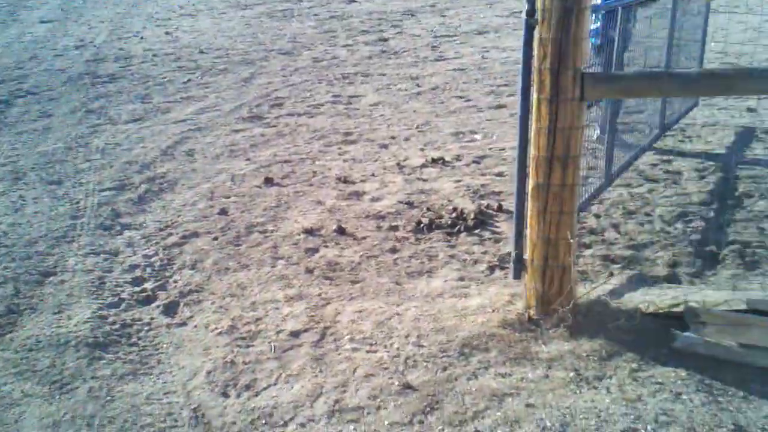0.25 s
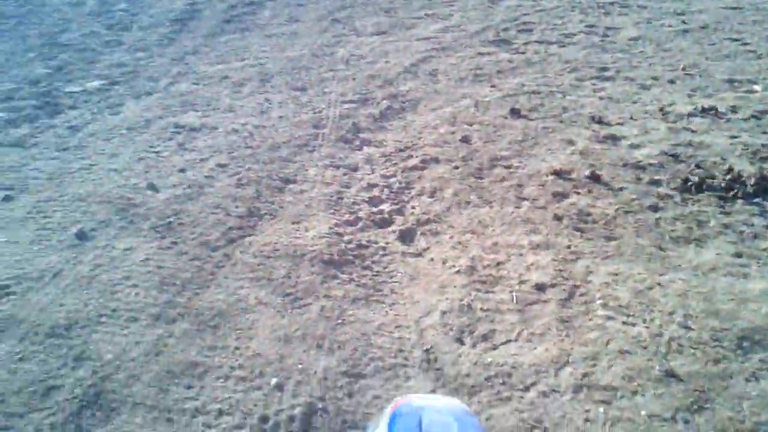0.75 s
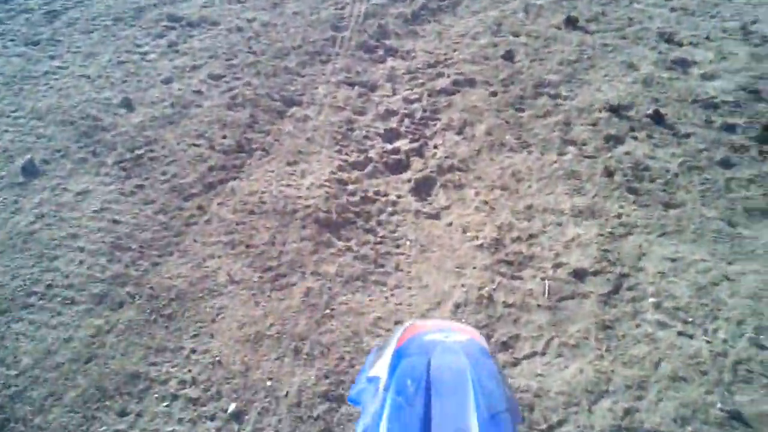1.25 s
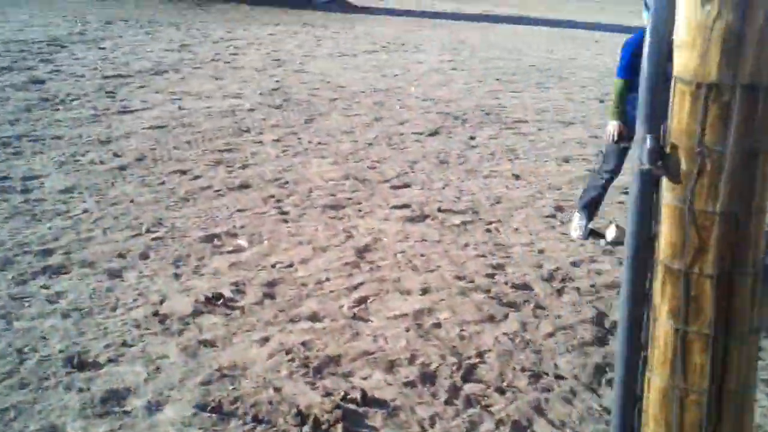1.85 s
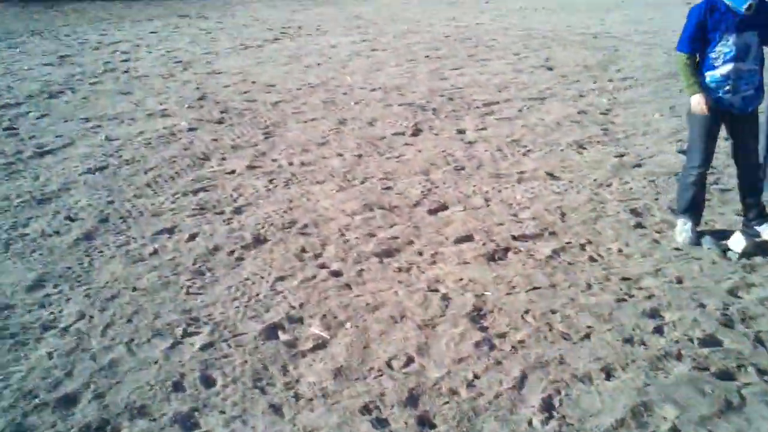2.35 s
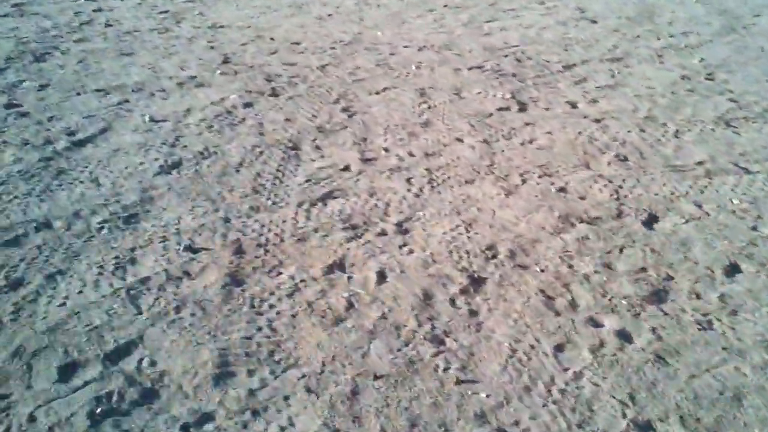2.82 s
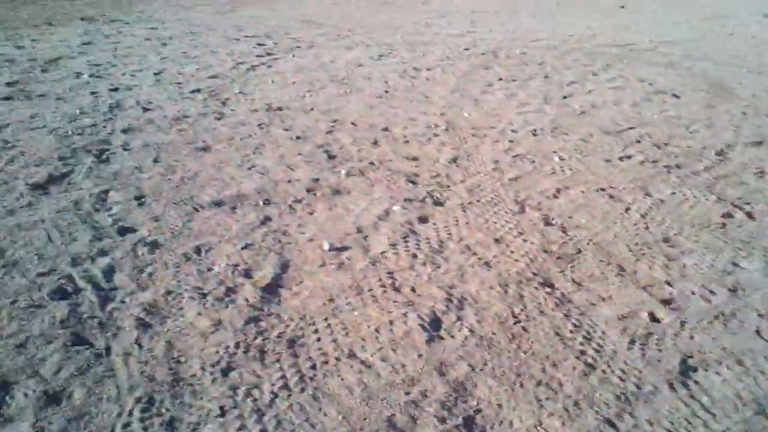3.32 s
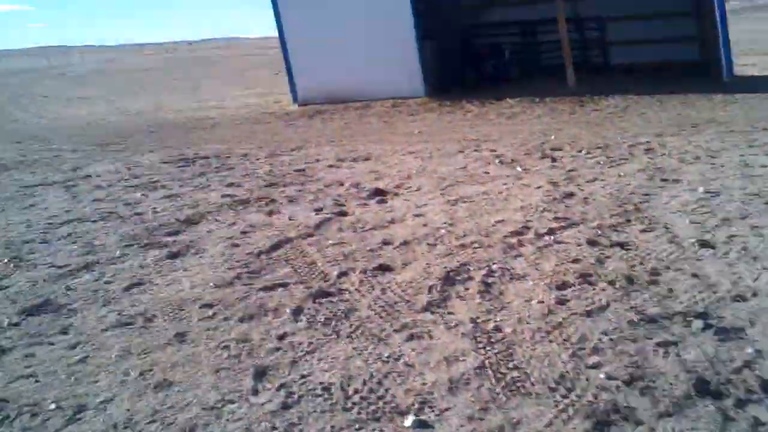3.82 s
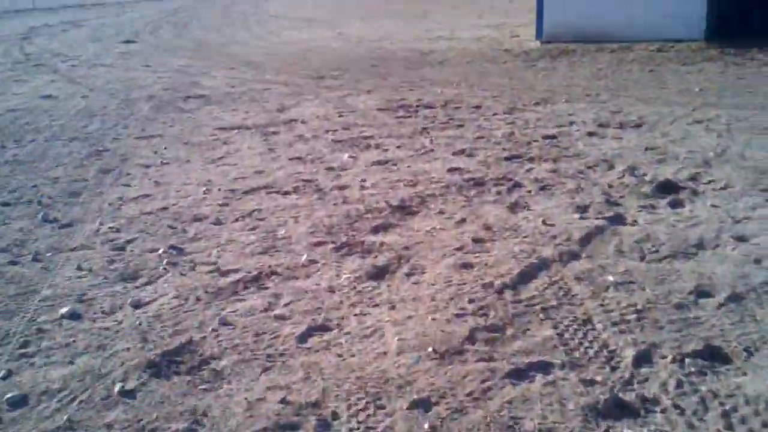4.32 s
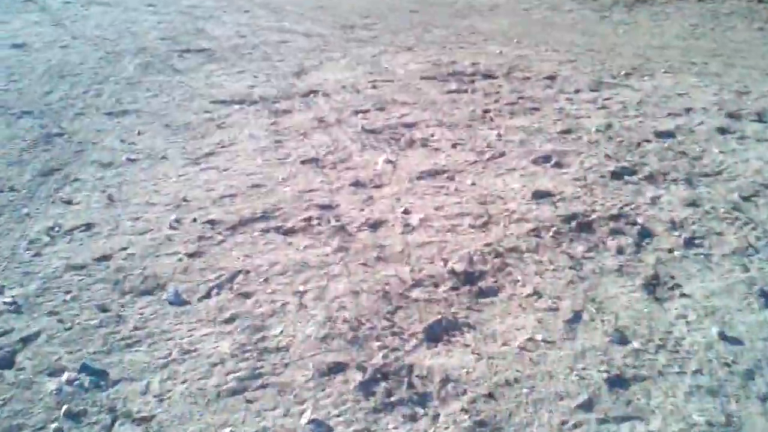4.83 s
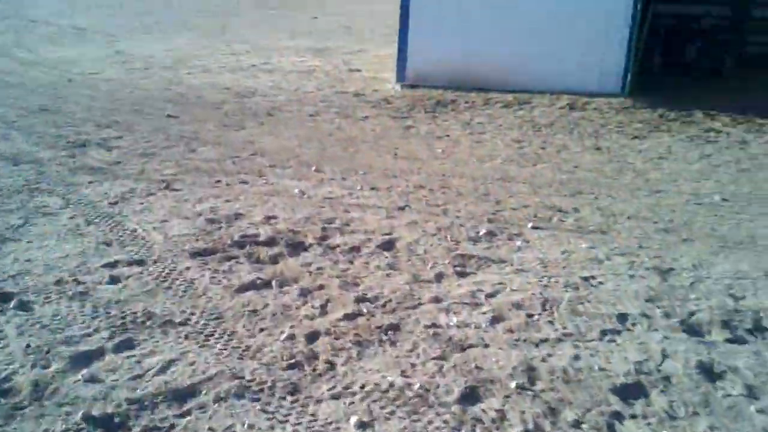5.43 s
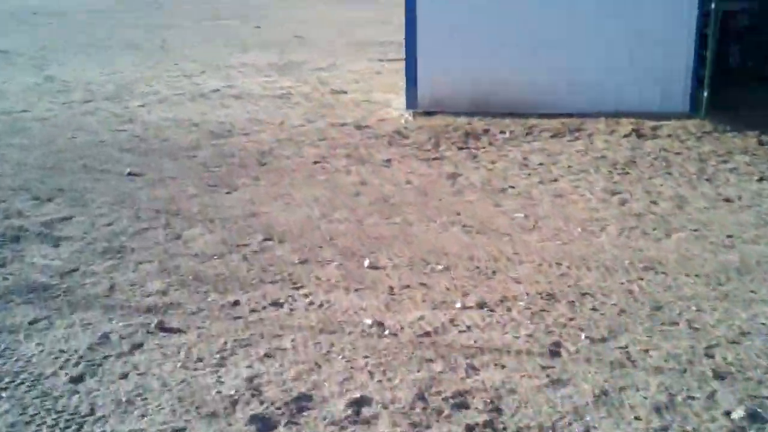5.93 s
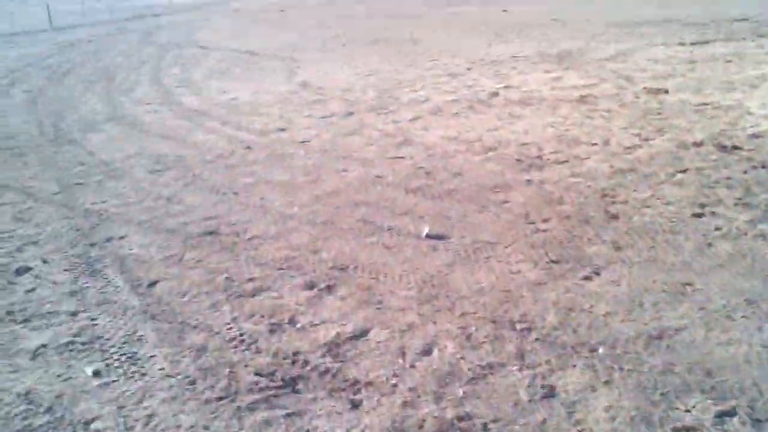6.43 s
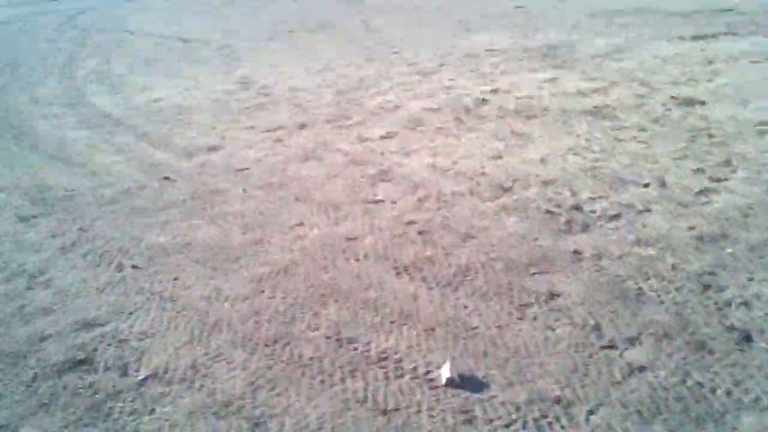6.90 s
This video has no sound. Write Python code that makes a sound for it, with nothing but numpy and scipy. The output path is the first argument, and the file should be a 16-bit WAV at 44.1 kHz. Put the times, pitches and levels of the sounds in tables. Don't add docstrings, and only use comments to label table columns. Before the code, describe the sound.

Close on a rider's helmet, a small two-stroke dirt bike gives three sharp throttle blips, dropping between them, with a brief metallic chatter as the throttle snaps shut. It sags low, picks up and rolls off in an uneven, sputtering burble, with dry piston knocks, fin rattle, exhaust spits and faint gear whine. Wind rumble grows; another engine hums faintly, in an open dirt yard.

```python
import sys
import numpy as np
from scipy import signal
from scipy.fft import rfft, irfft
from scipy.io import wavfile
from scipy.ndimage import uniform_filter1d

SR = 44100
rng = np.random.default_rng(int(sys.argv[2]) if len(sys.argv) > 2 else 0)


def natural_amplitude(level_db):
    exponent = np.asarray(level_db, float) / 20
    return 10 ** exponent


def wrap_up_sound(samples):
    columns = np.atleast_2d(samples).T
    tamed = np.clip(columns, -1, 1)
    steps = np.round(tamed * 32767).astype(np.int16)
    wavfile.write(sys.argv[1], SR, steps)


N = 315756
TIME = np.arange(N) / SR
FREQ = np.arange(N // 2 + 1) * SR / N

# time_s, speed_turns_hz
CRANK_SPEED = [(0, 66), (.125, 103), (.49, 43), (.7, 50), (.89, 118), (1.105, 85), (1.215, 120), (1.33, 90),
               (1.45, 53), (1.62, 61), (1.84, 36), (2.29, 64.5), (2.6, 44.5), (2.8, 47.5), (3.95, 48.5),
               (4.2, 52), (5.4, 57), (7.16, 57.5)]
# open_s, shut_s, open_level_db, shut_level_db
THROTTLE_TWISTS = [(-.05, 0.091, -19, -18), (0.45, 0.513, -46, -26), (0.55, 0.697, -32, -22.5),
                   (0.69, 0.74, -21, -18.5), (0.733, 0.854, -20, -20.5), (1.043, 1.13, -30.5, -17.5),
                   (1.122, 1.195, -14.5, -22), (1.43, 1.648, -28.5, -28), (1.71, 2.08, -36, -27),
                   (2.09, 2.265, -28, -22), (2.277, 2.51, -30.5, -26.5), (2.61, 2.715, -46, -26),
                   (2.72, 3.041, -31, -27.5), (3.115, 3.503, -29, -37), (3.5, 4.03, -36.5, -40),
                   (4.044, 4.2, -29, -28), (4.203, 4.33, -20, -24), (4.341, 4.642, -36, -37.5),
                   (4.656, 5.303, -24.5, -26), (5.294, 5.794, -23.5, -26), (5.802, 6.03, -21, -33),
                   (6.02, 6.124, -52, -28.5), (6.158, 6.373, -43, -33), (6.395, 6.789, -28, -25),
                   (6.78, 7.085, -27, -26), (7.127, 7.2, -22, 0.5)]
# start_s, end_s, level_db
BOG_DOWNS = [
    (0.203, 0.427, -5.5),
    (1.16, 1.463, -6.5),
    (2.486, 2.594, 6.5),
]
# time_s, level_db
ROLLING_LOAD = [(.6, 11), (.85, 11.5), (1.1, 8.5), (1.6, 2), (2.6, 0), (3.4, 6.5), (4.2, 14.5), (4.8, 13),
                (5.9, 8), (7.16, 11.5)]
# time_s, gas_noise_share [0-1]
ROUGHNESS = [(.13, .07), (.3, .4), (.6, .3), (.73, .04), (1.22, .03), (1.36, .35), (1.55, .12), (1.7, .3),
             (1.88, .04), (2.3, .025), (2.5, .1), (2.62, .14), (3, .08), (3.8, .3), (4.7, .14), (5.9, .13),
             (6.2, .35), (7.16, .2)]
# start_s, gap_s, peak_db, next_turn_loss_db (grows as turns squared)
CATCH_RUNS = [(2.399, .048, -5, 2.5), (2.55, .067, -2, 1.2), (2.684, .042, -1, 6.4), (3.058, .14, 6, 0.85),
              (3.198, .082, 1.5, 1.4), (3.444, .079, 5.5, 0.74), (3.602, .186, 7, 8.6), (3.788, .06, 4, 10),
              (3.907, .1, 2.5, 1.1), (4.058, .039, 2, 9.6), (4.215, .038, -5, .5), (4.309, .069, -4, 0.59),
              (4.378, .097, 3, 0.24), (4.475, .05, -0.5, 1.3), (4.577, .097, -1.5, 0.22),
              (4.674, .075, -1.5, .5), (4.748, .038, -3, 6), (4.787, .056, -1.5, 0.65),
              (4.844, .037, -4.5, 6.7), (4.916, .055, -4, .3), (4.971, .035, -1, 3.7),
              (5.004, .056, -1.5, 4.34), (5.062, .054, 4, 0.55), (5.115, .054, 3, 7),
              (5.171, .034, 3.5, 4.4), (5.204, .053, 5, 0.65), (5.311, .034, 3, 12), (5.345, .069, -1, 1),
              (5.414, .053, -2.5, 1.3), (5.466, .052, -6, 7.5), (5.519, .033, -6.5, 8.7),
              (5.551, .069, -5.5, 5.6), (5.62, .034, -3.5, 13), (5.654, .052, -2, 5),
              (5.706, .033, -0.5, 12), (5.74, .087, 0.5, 12), (5.826, .104, 8, 2.1), (5.93, .068, 10, 1.5),
              (5.997, .104, 6.5, 3.8), (6.102, .108, 1, 2.1), (6.21, .113, -3, 5.1),
              (6.323, .09, -0.5, 2.1), (6.413, .09, -4, 1.4), (6.684, .072, 1.5, 7),
              (6.827, .086, 15, 1.35), (6.913, .05, 14.5, 1.1), (6.962, .036, 6, 6.6),
              (7.035, .105, 0.5, 1.8), (7.138, .1, -9, 1.5)]
# mode_hz, width_hz, level_db
COOL_THUMP = [(184, 84, 5.5), (282, 195, -2.5)]
# mode_hz, width_hz, level_db
HOT_SILENCER = [(240, 108, 3), (310.5, 130, 6.5), (398, 89, -7)]
# mode_hz, width_hz, level_db
COOL_PIPE = [(420.6, 24, 19), (483.6, 112, 21), (641.6, 24, 5.5), (680, 40, 14.5), (850, 520, -4.5)]
# mode_hz, width_hz, level_db
HOT_EXHAUST = [(490.3, 120, 15), (576.6, 90.7, 10.5), (648, 130, 0), (872, 140, 0)]
# mode_hz, width_hz, level_db
COOL_FINS = [(965, 440, -7), (1258, 123, -2.5), (1318, 46, 4), (1674, 137, 6), (2250, 1400, -13),
             (3110, 510, -9)]
# mode_hz, width_hz, level_db
HOT_CYLINDER = [(1294, 40, -2), (1716, 134, -2.5), (2530, 520, -15.5), (3090, 470, -14)]
# time_s, level_db
PIPE_BARK = [(0, 0.5), (.12, 1), (.3, 3.5), (.7, -3), (.86, -3.5), (.92, 3.5), (1.07, 1), (1.14, -3),
             (1.22, -1), (1.27, 6), (1.45, 4.5), (2.3, 0), (3, 0.5), (4.4, -1), (5, -1.5), (5.7, -3),
             (6.9, -2.5)]
# time_s, level_db
GATE_RETURN = [(0, 0), (.8, -7), (1.5, -7), (1.9, -6.5), (2.2, -8), (2.8, -7), (3.6, -18.5), (4.8, -10.5),
               (5.8, -11), (7.16, -9.5)]
# start_s, gap_s, peak_db
TAIL_PUFFS = [(1.697, 0.037, -39), (1.87, .5, -62.5), (2.395, 0.063, -41), (2.49, 0.06, -43),
              (2.541, 0.039, -43), (2.632, 0.047, -39), (2.676, .042, -40.5), (3.09, .1, -53),
              (3.19, 0.1, -40), (3.352, 0.076, -33), (3.492, 0.044, -33), (3.596, 0.066, -35),
              (3.66, .045, -37), (3.704, 0.049, -39), (3.772, .065, -38), (3.9, .066, -35),
              (3.966, 0.041, -38), (4.01, .04, -46), (4.048, 0.054, -36), (4.166, 0.083, -37),
              (4.303, .07, -41), (4.375, 0.029, -40), (4.46, 0.039, -48), (4.506, 0.045, -42),
              (4.567, 0.081, -42), (4.66, 0.1, -41), (4.742, 0.11, -41), (4.845, 0.077, -45),
              (4.912, 0.099, -42), (5.002, 0.039, -35), (5.047, 0.094, -38), (5.16, 0.099, -42),
              (5.252, 0.058, -43), (5.303, 0.082, -47), (5.4, 0.08, -40), (5.522, 0.097, -37),
              (5.61, 0.049, -45), (5.7, 0.063, -40), (5.74, 0.056, -39), (5.819, 0.13, -39),
              (5.919, 0.088, -35), (5.986, 0.095, -34), (6.093, .103, -42), (6.197, 0.088, -35),
              (6.302, 0.085, -35), (6.404, 0.1, -27), (6.493, 0.13, -32.5), (6.579, 0.09, -29),
              (6.816, 0.075, -29.5), (6.9, 0.072, -31), (6.958, 0.056, -34), (7.026, .083, -40),
              (7.11, .08, -32)]
# time_s, level_db
FLOW_LULLS = [(.3, -2), (.38, -9.5), (.43, -4.5), (.45, 4), (.5, -16), (.54, -2), (1.33, 1.5), (1.42, -4),
              (1.44, 1), (2.55, -2), (2.6, -11), (2.64, -2.5), (2.8, 1.5), (3.06, 0), (3.15, -1),
              (7.16, -1)]
# freq_hz, level_db_per_hz
JET_SPECTRUM = [(3000, -2), (4500, -1.5), (5300, -2.5), (6800, 3), (9000, 1.5), (11500, -3), (13000, -10),
                (14000, -11)]
# freq_hz, level_db_per_hz
LEAK_SPECTRUM = [(3000, 13), (4500, 0), (7000, -3), (10000, -12), (14000, -45)]
# freq_hz, level_db_per_hz
SPIT_SPECTRUM = [(6000, -8.5), (9000, -34), (12000, -25), (14000, -2)]
# mode_hz, width_hz, level_db
SKIRT_MODES = [(1555, 504, 0.5), (990, 400, -9.5)]
# time_s, level_db
TURN_KNOCK_LEVEL = [(0, -54.5), (1.5, -54), (2.4, -54.5), (2.6, -50.5), (3, -52.5), (4, -49.5), (5, -45.5),
                    (7.16, -48.5)]
# time_s, peak_db
HARD_KNOCKS = [(2.538, -31), (2.58, -26), (2.603, -34), (2.672, -32), (2.714, -23), (2.759, -22),
               (3.196, -33), (3.311, -30), (3.412, -26), (3.493, -26), (3.573, -27), (3.593, -25.5),
               (3.695, -27), (3.736, -27), (3.756, -25), (3.856, -28), (3.878, -23), (3.897, -21),
               (3.979, -22), (4.045, -22), (4.164, -26), (4.201, -35), (4.296, -21), (4.366, -17),
               (4.407, -17), (4.504, -18), (4.543, -25), (4.565, -13), (4.623, -21), (4.641, -20),
               (4.664, -13), (4.738, -25.5), (4.905, -25), (5.001, -16), (5.05, -14), (5.158, -23),
               (5.247, -23), (5.303, -18), (5.59, -27), (5.609, -21), (5.641, -22), (5.665, -23),
               (5.695, -22), (5.727, -22), (5.815, -19), (5.832, -13), (5.919, -22), (6.07, -27),
               (6.089, -21), (6.106, -23), (6.231, -21.5), (6.289, -16), (6.9, -17), (6.952, -27),
               (6.986, -23), (7.019, -24)]
# time_s, pitch_hz, level_db
GEAR_MESH = [(2.03, 1080, -59), (2.15, 1130, -43), (2.3, 1290, -49), (2.5, 1100, -49), (2.65, 1060, -60),
             (2.85, 1075, -50), (3.3, 1090, -50), (3.6, 1050, -60), (4.2, 1150, -55), (4.4, 1360, -46),
             (4.62, 1370, -39), (4.66, 1140, -41), (5.1, 1175, -47), (5.7, 1250, -47), (6.1, 1260, -47),
             (6.9, 1270, -42.5)]
# freq_hz, level_db
PORT_DIFFERENCE = [(100, -74), (280, -25.5), (500, -17), (1000, -7), (1700, -6.5), (2200, 5.5), (3300, -3),
                   (4500, -0.5), (9000, 0.5), (14000, 2.5)]
# time_s, level_db
HEAD_TURN = [(0, 5), (3.7, 8.5), (4, -42), (5.3, -9), (5.8, 3), (6.5, -6)]
# time_s, peak_db
GRIT_TICKS = [
    (1.783, -49),
    (2.8495, -45),
    (5.046, -37),
    (6.409, -45),
]
# freq_hz, level_db_per_hz
WIND_SPECTRUM = [(25, -25), (60, -13.5), (110, -5.5), (180, 4.5), (300, -3), (600, -10.5), (1200, -25),
                 (2500, -40.5)]
# freq_hz, level_db
WIND_DIFFERENCE = [(25, -10), (60, 7.5), (125, -5), (250, -4.5)]
# time_s, level_db
WIND_LEVEL = [(0, -49), (3, -32), (7.16, -29)]

# level_db at 50 turns/s, db_per_octave of speed, shares of throttle swing, afterglow, rolling load
PIPE_LAW = (-33, 10.5, 0.5, 0, 0.5573)
FINS_LAW = (-47.5, 12, 0.1148, -0.07, 1)
HISS_LAW = (-51.5, 8, 0.1842, 0.0544, 0.1559)
FLYWHEEL_S, AFTERGLOW_S, PICK_UP_S = .028, 0.69, 0.034
OPEN_DB_PER_S, SHUT_DB_PER_S = 902, 490
COAST_DB, COAST_DB_PER_OCTAVE = -46.5, 7.5
CALM_DB, ROUGH_DB = .3, 7
MISS_DB, PIPE_MISS_DB = 10, 5.5
SLAP_LEAD_S = .0115
ECHO_S, ECHOES_DB = .0035, (0, 1.5, -3.5)
GATE_ECHO_S = 0.012005
PUFF_SCATTER_DB, PUFF_SHARE, SEEP_DB = 1.1, .55, -45
PATCHY_DB, SPIT_DB = 1.5, -1
HARD_DB = 21.5
CLANK_S, CLANK_DB = 1.198, -27
DRONE_HZ, DRONE_WIDTH_HZ = 129.8, 9
DRONE_DB, DRONE_FADE_DB_PER_S, DRONE_WAVER_DB = -37, 0.95, 2.5
WIDEN_LAG, WIDEN_FLAT, LIMIT = 17, .4, 1.1


def curves(rows):
    s, *columns = np.transpose(rows)
    return [np.interp(TIME, s, c) for c in columns]


def colour(x, points):
    hz, db = np.transpose(points)
    gain_db = np.interp(np.log(FREQ + 1), np.log(hz), db)
    return irfft(rfft(x) * natural_amplitude(gain_db), N)


def ring(x, modes, passes):
    s = 1j * (FREQ + 1)
    body = 0
    for k, (hz, width_hz, db) in enumerate(modes):
        mode = s * width_hz / (s * s + s * width_hz + hz * hz)
        body = body + (-1) ** (k * passes) * natural_amplitude(db) * mode ** passes
    return irfft(rfft(x) * body, N)


def even(x, span_s=0.2):
    k = int(span_s * SR)
    power = np.atleast_2d(x)[0] ** 2
    return x / np.sqrt(uniform_filter1d(uniform_filter1d(power, k), k) + 1e-18)


def walk(rate_hz):
    k = int(SR / rate_hz)
    held = np.repeat(rng.standard_normal(N // k + 1), k)
    return uniform_filter1d(uniform_filter1d(held, k), k)[:N]


def blow(pulses, decay_s):
    return signal.lfilter([1], [1, -np.exp(-1 / (decay_s * SR))], pulses)


def fill(runs):
    ends = [row[0] for row in runs[1:]] + [runs[-1][0] + runs[-1][1]]
    rows = []
    for (s, gap, *rest), end in zip(runs, ends):
        count = max(round((end - s) / gap), 1)
        rows += [(s + k * (end - s) / count, gap, *rest) for k in range(count)]
    return np.transpose(rows)


def bike():
    turns_hz = crank()
    octaves = np.log2(turns_hz / 50)
    thump_db = throttle(octaves)
    (roll_db,), (share,) = curves(ROLLING_LOAD), curves(ROUGHNESS)
    glow_db = blow(thump_db + 26, AFTERGLOW_S) / (AFTERGLOW_S * SR)
    glow_db += (thump_db[0] + 65) * np.exp(-TIME / AFTERGLOW_S)

    def follow(law):
        db, rise_db, push, glow, load = law
        return (db + rise_db * octaves + push * (thump_db + 26.5) + glow * glow_db
                + bog() + load * roll_db)

    pipe_db = follow(PIPE_LAW) + curves(PIPE_BARK)[0] - 4.5
    fins_db = follow(FINS_LAW) - 5.5
    hiss_db = follow(HISS_LAW) + curves(FLOW_LULLS)[0] + 3.5
    heat = np.clip((turns_hz - 57) / 24, 0, 1)
    warm = np.clip((turns_hz - 57) / 12, 0, 1)
    pulses, barks, slaps = firings(turns_hz, CALM_DB + ROUGH_DB * share)

    air = rng.standard_normal((2, N))
    air[1] = 0.32 * air[0] + 1.04 * air[1]
    gas = (even(blow(pulses, .008)) + 1) * air
    rattle = (even(blow(slaps, .004)) + natural_amplitude(-4.5)) * air

    firing = echoes(pulses, warm, heat)
    thump = voice(firing, gas, COOL_THUMP, HOT_SILENCER, 3, .5 * share, warm)
    pipe = voice(barks, gas, COOL_PIPE, HOT_EXHAUST, 2, .015 + 1.35 * share, heat)
    fins = voice(slaps, rattle, COOL_FINS, HOT_CYLINDER, 1, .66 - .3 * heat + .3 * share, heat)

    out = natural_amplitude(thump_db + 5.5) * thump + natural_amplitude(pipe_db) * pipe
    out += natural_amplitude(fins_db) * fins + natural_amplitude(hiss_db) * hiss(pulses)
    out += natural_amplitude(.5 * (thump_db + 31.0)) * gears() + clank(air) + knocks(slaps)
    return np.array([out[0], ports(out[1])])


def crank():
    return uniform_filter1d(curves(CRANK_SPEED)[0], int(FLYWHEEL_S * SR), mode="nearest")


def throttle(octaves):
    power = natural_amplitude(COAST_DB + COAST_DB_PER_OCTAVE * octaves + bog()) ** 2
    for opens, shuts, first_db, last_db in THROTTLE_TWISTS:
        db = np.interp(TIME, [opens, shuts], [first_db, last_db])
        db -= OPEN_DB_PER_S * np.maximum(opens - TIME, 0)
        db -= SHUT_DB_PER_S * np.maximum(TIME - shuts, 0)
        power = np.maximum(power, natural_amplitude(db) ** 2)
    return 10 * np.log10(power)


def bog():
    return sum(np.interp(TIME, [start, end, end + PICK_UP_S], [0, db, 0])
               for start, end, db in BOG_DOWNS)


def firings(turns_hz, scatter_db):
    s, _, peak_db, loss_db = fill(CATCH_RUNS)
    starts = np.transpose(CATCH_RUNS)[0]
    free = np.cumsum(turns_hz) / SR
    at_catch = np.interp(starts, TIME, free)
    whole = np.cumsum(np.maximum(np.round(np.diff(at_catch)), 1))
    turn_of_start = np.ceil(at_catch[0]) + np.r_[0, whole]
    phase = free + np.interp(TIME, starts, turn_of_start - at_catch)
    turn_of_catch = np.round(np.interp(s, TIME, phase))
    turn = np.arange(np.ceil(phase[0]), phase[-1])
    when = np.interp(turn, phase, TIME)

    last = np.maximum(np.searchsorted(turn_of_catch, turn, "right") - 1, 0)
    later = np.maximum(turn - turn_of_catch[last], 0)
    burn_db = peak_db[last] - np.minimum(loss_db[last] * later ** 2, MISS_DB)
    chance = rng.standard_normal((900, 3))[:len(turn)].T
    uncaught = (later > 0) | (turn < turn_of_catch[0])
    burn_db += np.interp(when, TIME, scatter_db) * chance[0] * uncaught
    when += .00012 * chance[1] * np.interp(when, TIME, scatter_db)

    def clicks(lead_s, db):
        train = np.zeros(N)
        train[np.clip((when - lead_s) * SR, 0, N - 1).astype(int)] = natural_amplitude(db)
        return train

    pulses = clicks(.004, burn_db)
    barks = clicks(.004, burn_db - PIPE_MISS_DB * (later > 0))
    slaps = clicks(SLAP_LEAD_S, .45 * burn_db + 1.6 * chance[2])
    return pulses, barks, slaps


def echoes(pulses, warm, heat):
    echoed = sum(natural_amplitude(db) * np.roll(pulses, int(k * ECHO_S * SR)) for k, db in enumerate(ECHOES_DB))
    firing = warm * pulses + (1 - warm) * echoed / 2
    gate_gain = (1 - .8 * warm) * (1 - heat) * natural_amplitude(curves(GATE_RETURN)[0])
    return firing + gate_gain * np.roll(firing, int(GATE_ECHO_S * SR))


def voice(clicks, noise, cool, hot, passes, noisy, heat):
    drive = np.vstack([clicks, noise])
    body = ring((1 - heat) * drive, cool, passes) + ring(heat * drive, hot, passes)
    return np.sqrt(1 - noisy) * even(body[0]) + np.sqrt(noisy) * even(body[1:])


def puffs():
    gain = natural_amplitude(SEEP_DB + 6 * (TIME < 2.39) - 4 * (TIME > 5.9))
    t = TIME[:SR // 5]
    starts, gaps, dbs = fill(TAIL_PUFFS)
    dbs = dbs + PUFF_SCATTER_DB * rng.standard_normal(120)[:len(dbs)]
    for s, gap, db in zip(starts, gaps, dbs):
        i = int(s * SR)
        shape = np.clip(t / .004, 0, 1) / (1 + (t / (PUFF_SHARE * gap)) ** 6)
        gain[i:i + len(t)] += natural_amplitude(db) * shape[:N - i]
    return gain


def hiss(pulses):
    flow = even(puffs() * (1 + .5 * even(blow(pulses, 0.0092))), 0.19)
    jets = colour(flow * natural_amplitude(2.13 * walk(14)) * rng.standard_normal((2, N)), JET_SPECTRUM)
    high = signal.sosfilt(signal.butter(4, 8000, "high", fs=SR, output="sos"), jets)
    jets = natural_amplitude(PATCHY_DB * walk(22)) * (jets - high) + natural_amplitude(PATCHY_DB * walk(18)) * high
    leak = colour(rng.standard_normal((2, N)), LEAK_SPECTRUM)
    spit = colour(even(puffs() ** 2 * rng.standard_normal((2, N)), 0.41), SPIT_SPECTRUM)
    leak_gain = natural_amplitude(-6.5 - 1.6 * (TIME > 5.9))
    return jets + leak_gain * leak + natural_amplitude(SPIT_DB + 2 * PATCHY_DB * walk(16)) * spit


def knocks(slaps):
    s, db = np.transpose(HARD_KNOCKS)
    hard = np.zeros(N)
    hard[((s + .001) * SR).astype(int)] = natural_amplitude(db + HARD_DB)
    every_turn = natural_amplitude(curves(TURN_KNOCK_LEVEL)[0]) * even(ring(slaps, SKIRT_MODES, 2))
    return every_turn + ring(hard, SKIRT_MODES, 2)


def gears():
    hz, db = curves(GEAR_MESH)
    tone = np.sin(2 * np.pi * np.cumsum(hz * (1 + .045 * walk(260))) / SR)
    return natural_amplitude(db - 2 + 5 * walk(18)) * tone * (TIME > GEAR_MESH[0][0])


def clank(air):
    t = TIME - CLANK_S
    decay = (t > 0) * np.exp(-np.abs(t) / 0.02)
    chatter = decay * (1 + 1.1 * np.cos(2 * np.pi * 112 * t))
    return natural_amplitude(CLANK_DB + 12) * ring(chatter * air, [(3350, 690, 0)], 1.44)


def ports(out):
    side = -colour(out, PORT_DIFFERENCE)
    low = signal.sosfiltfilt(signal.butter(4, 1650, fs=SR, output="sos"), side)
    return side + (natural_amplitude(curves(HEAD_TURN)[0]) - 1) * low


def grit():
    s, db = np.transpose(GRIT_TICKS)
    hits = np.zeros(N)
    hits[(s * SR).astype(int)] = natural_amplitude(db + 6)
    return ring(blow(hits, 0.002) * rng.standard_normal((2, N)), [(11000, 11000, 0)], 0.92)


def wind():
    rumble = even(colour(rng.standard_normal((2, N)), WIND_SPECTRUM), 1.0)
    rumble[1] = colour(rumble[1], WIND_DIFFERENCE)
    return natural_amplitude(curves(WIND_LEVEL)[0] + 1.9 * walk(9)) * rumble * np.array([[1.1], [1]])


def drone():
    hum = np.sin(2 * np.pi * np.cumsum(DRONE_HZ + DRONE_WIDTH_HZ / 4 * walk(12)) / SR)
    rumble = even(ring(rng.standard_normal(N), [(111.0, 20, 0)], 1.14), 0.64)
    level_db = DRONE_DB + 6.5 - DRONE_FADE_DB_PER_S * TIME + DRONE_WAVER_DB * walk(5)
    return natural_amplitude(level_db) * (hum + 0.71 * rumble) * np.array([[1], [natural_amplitude(-53)]])


def scene():
    mid, side = bike() + wind() + drone() + grit()
    return np.array([mid + side, mid - side])


def band_limit(x):
    return signal.sosfilt(signal.butter(12, 14140, fs=SR, output="sos"), x)


def record(dry):
    size = 2 * WIDEN_LAG + 1
    lowpass = signal.firwin(size, 5300, fs=SR)
    taps = WIDEN_FLAT * signal.unit_impulse(size, "mid") + (1 - WIDEN_FLAT) * lowpass
    swapped = np.pad(dry[::-1], ((0, 0), (size, 0)), "reflect")
    late = signal.lfilter(taps, 1, swapped)[:, size:]
    wide = LIMIT * np.tanh((dry - late) / LIMIT)
    return band_limit(wide)


dry = scene()
out = record(dry)
wrap_up_sound(out)
```